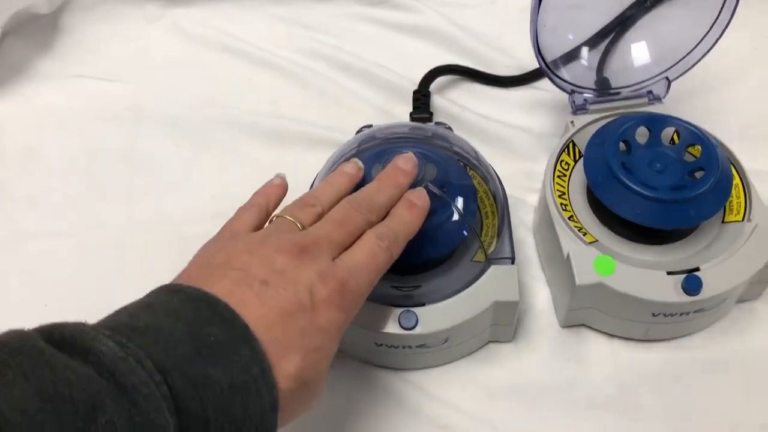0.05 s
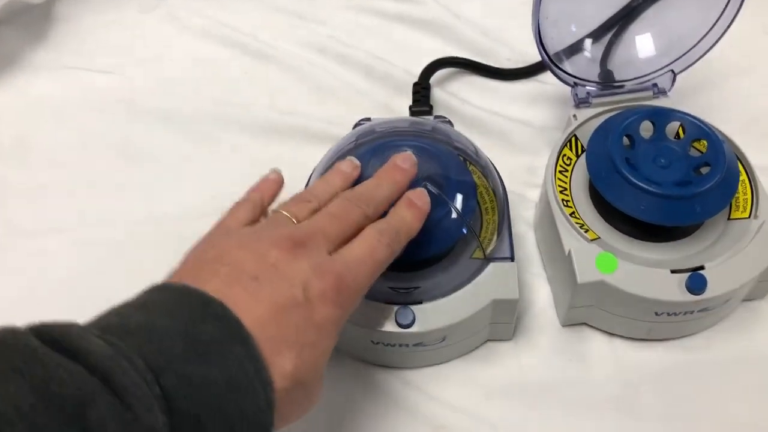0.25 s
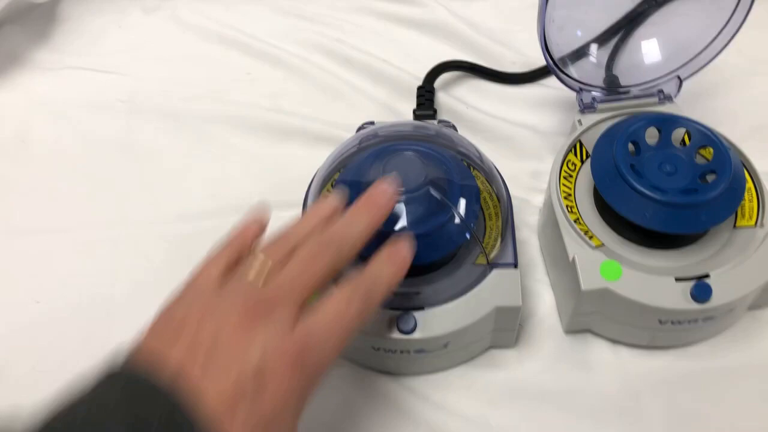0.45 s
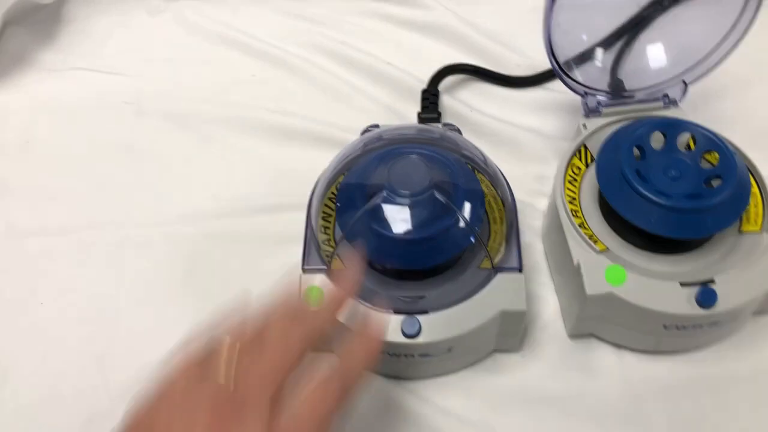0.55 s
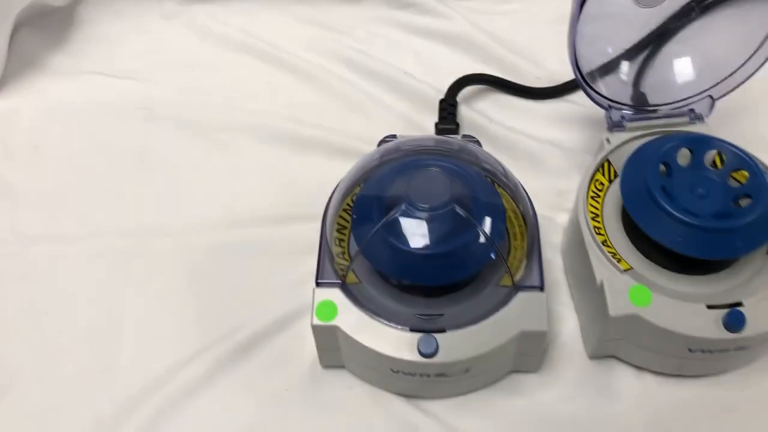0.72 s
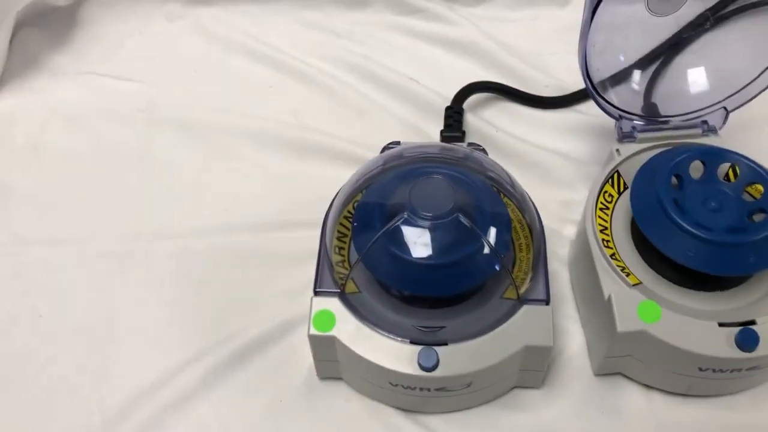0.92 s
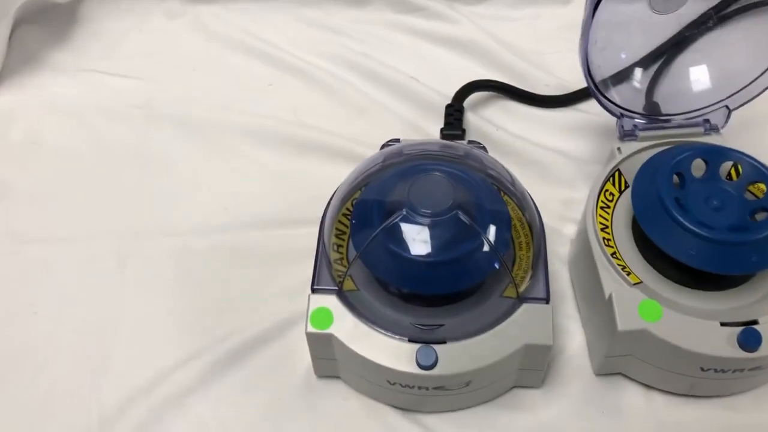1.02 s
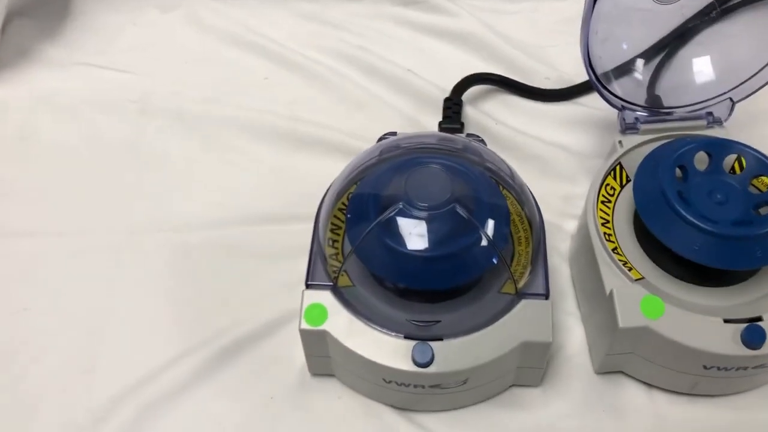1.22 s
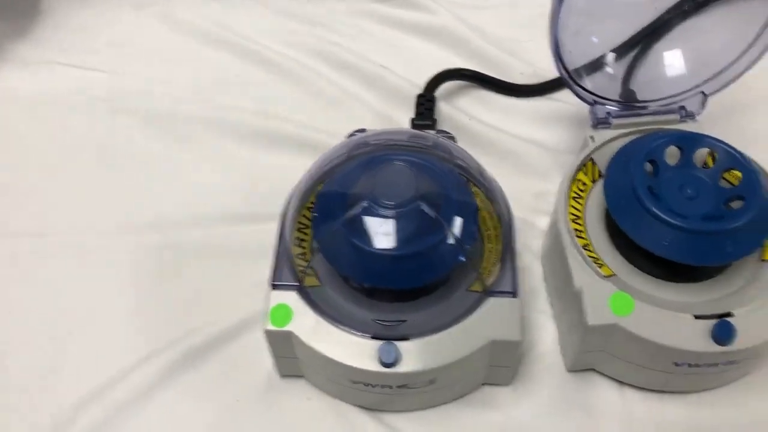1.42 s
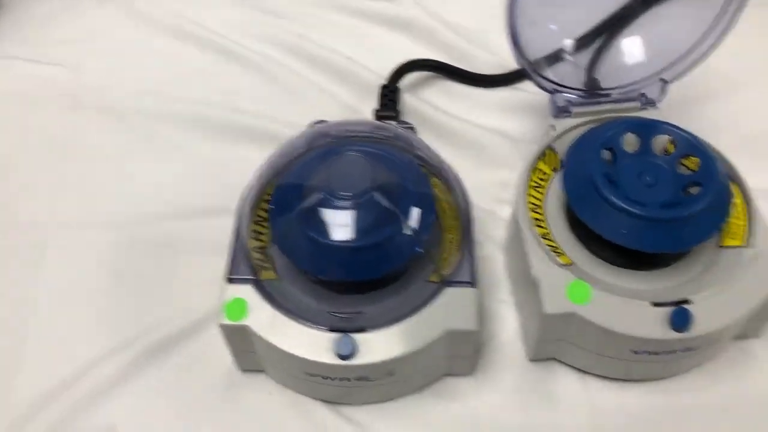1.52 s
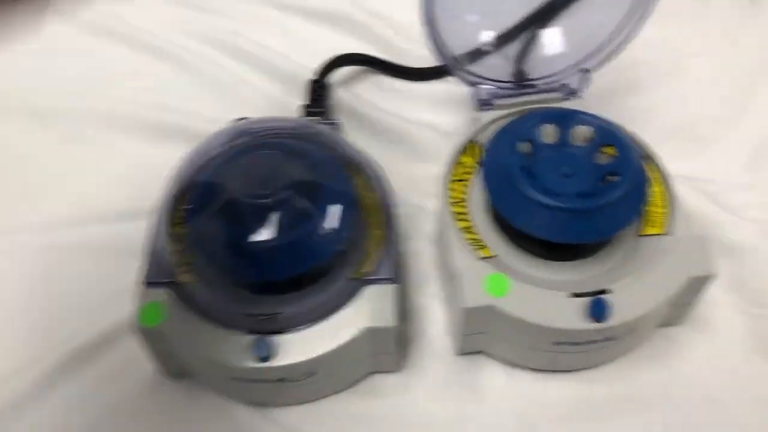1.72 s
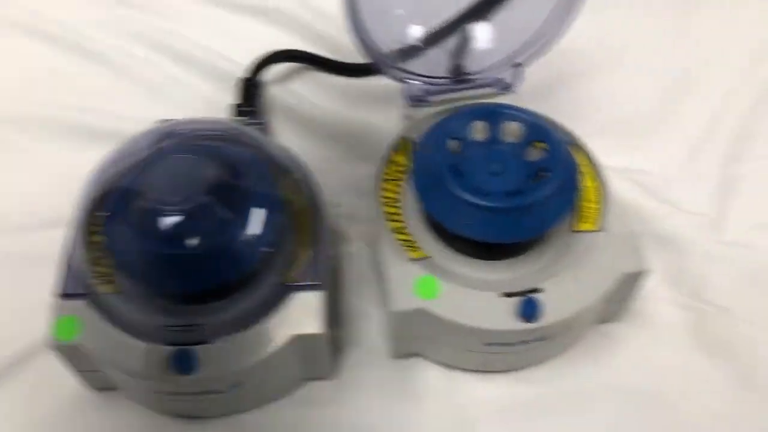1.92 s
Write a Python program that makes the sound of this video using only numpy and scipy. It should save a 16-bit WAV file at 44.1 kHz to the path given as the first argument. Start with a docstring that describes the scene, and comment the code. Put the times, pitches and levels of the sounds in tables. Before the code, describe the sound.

Close up in a quiet small room, a centrifuge's plastic lid ticks and clacks shut, soft clicks follow as the hand lets go, and the electric motor spins up with a growing whir and hiss.

```python
"""Closing the lid of a mini centrifuge

Close microphone, mono, in a small quiet room: a hand presses the plastic lid shut. It ticks, snaps home
and knocks the base, then clicks as the hand lets go; these contacts are noise bursts and struck modes.
Closing starts a small brush motor that runs up towards its top speed. Its harmonics sweep through the
housing's resonances, the brushes rasp over a surface met again on every turn, and the bearing rumbles."""
import sys
import numpy as np
from scipy import signal
from scipy.fft import rfft, irfft
from scipy.io import wavfile

SR = 44100
rng = np.random.default_rng(int(sys.argv[2]) if len(sys.argv) > 2 else 0)


def store_wav(level_fs):
    """Save 16-bit WAV to argv[1]."""
    pcm = np.round(np.clip(np.atleast_2d(level_fs), -1, 1) * 32767)
    wavfile.write(sys.argv[1], SR, pcm.T.astype(np.int16))


N = 85995

TOP_SPEED_HZ, MOTOR_ON_S, RUN_UP_S = 115.12, .2266, 1.007
REFERENCE_SPEED_HZ = 80  # turns per second at which growth gains are 0 dB
THROB_TURN = .76  # place in the turn where hum and bearing throb
CUTOFF_HZ = 15900  # top of the recorder's range


def undb(db):
    """Decibels to gain."""
    return 10 ** (np.asarray(db) / 20)


def unit(x):
    """Scale to rms 1."""
    return x / np.sqrt(np.mean(x ** 2))


def gain_at(hz, points):
    """Gain of a (Hz, dB) curve at the given frequencies, interpolated over log frequency."""
    f, db = np.array(points).T
    return undb(np.interp(np.log(np.maximum(hz, 1)), np.log(f), db))


def colour(x, points):
    """Causal minimum-phase filter with the shape of a (Hz, dB) curve; white noise keeps its level."""
    bins_hz = np.arange(N + 1) * SR / (2 * N)
    cepstrum = irfft(np.log(unit(gain_at(bins_hz, points))))
    # folding the cepstrum onto positive time makes the filter causal
    cepstrum[1:N] *= 2
    cepstrum[N + 1:] = 0
    response = np.exp(rfft(cepstrum))
    return irfft(rfft(x, 2 * N) * response)[:N]


def filtered(x, hz, kind, order=2):
    """Butterworth filter."""
    edges = np.clip(hz, 10, SR / 2 - 100)
    return signal.sosfilt(signal.butter(order, edges, kind, fs=SR, output="sos"), x)


def band_around(x, centre_hz, width_hz, order=2):
    """Narrow band of rms 1."""
    return unit(filtered(x, [centre_hz - width_hz / 2, centre_hz + width_hz / 2], "band", order))


def noise():
    """White noise with an expected rms of 1."""
    return rng.standard_normal(N)


def fade(t, start, ms):
    """Exponential decay from a starting time, down to 1/e after the given milliseconds."""
    return (t >= start) * np.exp(-np.maximum(t - start, 0) * 1000 / ms)


def fall(age, t60):
    """Exponential decay that loses 60 dB in t60 seconds."""
    return np.exp(-np.log(1000) * age / t60)


def ring(t, start, hz, t60):
    """A struck mode: a decaying sine."""
    age = np.maximum(t - start, 0)
    return np.sin(2 * np.pi * hz * age) * fall(age, t60)


def burst(envelope, count=3):
    """Noise under an envelope, evened out to a nearly flat spectrum."""
    x = envelope * rng.standard_normal(len(envelope))
    for _ in range(count):
        flat = irfft(np.exp(1j * np.angle(rfft(x))), len(x)) * np.linalg.norm(envelope)
        x = np.clip(flat, -np.pi * envelope, np.pi * envelope)
    return x


def growth(speed, db_per_doubling):
    """Gain that follows the motor speed, with an extra linear fade-in below 10 turns per second."""
    doublings = np.log2(np.maximum(speed, 1) / REFERENCE_SPEED_HZ)
    return undb(db_per_doubling * doublings) * np.minimum(speed / 10, 1)


def air():
    """Steady background air of the room: coloured noise."""
    # spectrum shape of the air: f/Hz, relative level/dB
    air_curve = [(25, -15), (45, -8), (62, 12.5), (100, -3), (200, -2), (500, -17.5), (1000, -20.5),
                 (2500, -21), (6000, -34.5), (15000, -35)]
    return undb(-62) * colour(noise(), air_curve)


def lid(t, size=4096):
    """Each contact is an impact and a short crack that ring the lid."""
    # sharp contacts of lid and catch: t/s, level/dB, decay to 1/e in ms
    clicks = [(0.0227, -53.5, 4.3), (0.05, -42.5, 7.5), (0.0576, -46.5, 3), (.1008, -38.5, 7.4),
              (0.1056, -43, 2), (.1303, -38, 2.9), (0.1848, -46, 4.1), (0.2144, -43.5, 2.3),
              (0.2172, -37.5, 1.5), (0.228, -40.5, 14), (0.2358, -5.5, 2.68), (0.2384, -7.5, 1.6),
              (.256, -25.5, 14), (0.4774, -41, 1), (0.4841, -39.5, 5.6), (0.492, -50, 3.7),
              (0.512, -39.5, 6), (0.5125, -44, 6)]
    # spectrum shape of a click: f/Hz, relative level/dB
    click_curve = [(150, -13), (600, -4), (1100, -2), (1800, 3.5), (2400, .5), (3050, 5), (3700, 1),
                   (6000, -2.5), (9000, -3.5), (11500, -1.5), (15500, -3)]
    # modes of the lid: f/Hz, level/dB, t60/s
    lid_modes = [(1620, -31, .06), (1830, -24, .06), (2040, -29, .06), (2950, -26, .06), (3070, -29, .05),
                 (3275, -22, .045), (4060, -28, .06)]
    crack, taps = np.zeros(N), np.zeros(N)
    for s, db, ms in clicks:
        start = int(s * SR)
        crack[start:start + size] += undb(db) * burst(fade(t[:size], 0, ms))
        taps[start] += undb(db)
    modes = sum(undb(db) * ring(t, 0, hz, t60) for hz, db, t60 in lid_modes)
    clack = colour(crack + undb(3) * taps, click_curve)  # impacts are raised by 3 dB
    return clack + signal.fftconvolve(taps, modes)[:N]


def base(t):
    """Each blow is a damped push with a dull thud; it rings the base's modes near its own pitch most."""
    # dull blows on the base: t/s, level/dB, push f/Hz, push decay to 1/e in ms
    knocks = [(0.055, -40.5, 557, 9.1), (.1015, -28.5, 626, 12), (.106, -46.5, 218, 15),
              (.2365, -20.5, 528, 4.4), (0.245, -19, 470, 6), (0.2537, -15.5, 504, 9.7),
              (0.259, -13.5, 296, 9), (.494, -39, 415, 13.5), (0.5135, -27, 394, 3.2)]
    # modes of the base: f/Hz, level/dB for a push at the mode's own pitch, t60/s
    base_modes = [(80, -17, .2), (156, -18, .18), (186, -17, .18), (298, -11, .13), (391, -19, .12),
                  (494, -12, .12), (556, -16, .12), (632, -17, .07), (800, -22, .07), (902, -19, .09),
                  (1022, -20, .09)]
    PUSH_RISE_MS = 1.2
    THUD_DB, THUD_MS, THUD_BAND_HZ = -4.5, 5.4, [189, 833]
    blows, thud = 0, 0
    for s, db, push_hz, ms in knocks:
        onset = undb(db) * np.clip((t - s) * 1000 / PUSH_RISE_MS, 0, 1)
        push = fade(t, s, ms) * np.sin(2 * np.pi * push_hz * (t - s))
        modes = 0
        for k, (hz, mode_db, t60) in enumerate(base_modes):
            nearness = min(hz / push_hz, push_hz / hz) ** 0.21
            sign = (-1) ** k  # neighbouring modes start in opposite directions
            modes = modes + undb(mode_db) * nearness * sign * ring(t, s, hz, t60)
        blows = blows + onset * (push + modes)
        thud = thud + onset * undb(THUD_DB) * fade(t, s, THUD_MS)
    return blows + thud * unit(filtered(noise(), THUD_BAND_HZ, "band"))


def room(t, x):
    """Dense early echoes from bench and walls, then a tail whose decay differs from band to band."""
    # room echo by band: centre f/Hz, level/dB, t60/s of the tail
    room_bands = [(151, -14.5, 0.66), (390, -10.5, 0.575), (930, -10.5, 0.28), (2180, -13.5, 0.29),
                  (4400, -10, 0.28), (7700, -23, 0.1), (13900, -30.5, .22)]
    BUILD_S, EARLY_DB, EARLY_T60_S = 0.0096, 6, 0.16
    centres = np.array(room_bands)[:, 0]
    edges = np.concatenate([[centres[0] / 2], np.sqrt(centres[1:] * centres[:-1]), [CUTOFF_HZ]])
    response = 0
    for k, (hz, db, t60) in enumerate(room_bands):
        decay = fall(t, t60) + undb(EARLY_DB) * fall(t, EARLY_T60_S)
        shape = decay * np.minimum(t / BUILD_S, 1)
        echoes = filtered(burst(shape), edges[k:k + 2], "band")
        response = response + undb(db) * echoes / np.linalg.norm(shape)
    return signal.fftconvolve(x, response)[:N]


def hum(speed, turns):
    """Motor harmonics bunch into one throb a turn and swell as they cross the housing's resonances."""
    # motor harmonics: multiple of the turn rate, level/dB at the reference speed before the housing,
    # growth/dB per doubling of speed
    harmonics = [(2, -56.5, -14), (3, -57.5, 8.5), (4, -66, 9), (5, -53, 17), (6, -55, 16), (7, -57.5, 22),
                 (8, -89, -8), (9, -55, 2), (10, -80, 15), (11, -71.5, -8), (12, -71, -8), (13, -66, 4),
                 (14, -80, -2), (15, -64, -5), (16, -77, -8.5), (17, -75.5, 32), (18, -90, 19),
                 (21, -68, 1), (27, -68, 8), (33, -70, 7), (46, -66, 17), (49, -73, 17), (51, -64.5, 13),
                 (60, -63.5, 21), (62, -67.5, 18), (69, -64.5, 16), (75, -65.5, 14)]
    # resonances of the housing: f/Hz, gain/dB
    housing = [(100, -33), (170, -3), (200, -1), (270, 1.5), (310, -1.5), (365, 2), (455, -7), (545, -3),
               (680, -9), (790, -4.5), (860, 5.5), (1000, -9), (1200, -14.5), (1290, 13), (1400, 0),
               (1560, -9), (1690, -6), (1770, 8.5), (1850, -3), (2600, -20), (3300, -2.5), (3850, 5),
               (4200, -32), (4550, -4), (4850, 1), (5100, -25), (5450, -5), (5850, 11), (6200, 0),
               (6500, -20), (7000, 0)]
    PHASE_SCATTER_CYCLES = .13  # random spread of each harmonic's phase
    FULL_HUM_HZ = 36.3  # speed at which the hum has built up
    tones = 0
    for k, db, rise_db in harmonics:
        level = undb(db) * growth(speed, rise_db) * gain_at(k * speed, housing)
        cycles = k * (turns - THROB_TURN) + PHASE_SCATTER_CYCLES * rng.standard_normal()
        tones = tones + level * np.sin(2 * np.pi * cycles)
    return tones * np.minimum(speed / FULL_HUM_HZ, 1) ** 3


def track(turns, size=512, order=8):
    """A random surface profile with all harmonics equally strong, met again on every turn."""
    profile = irfft(np.exp(2j * np.pi * rng.random(size // 2)), size * order)
    around = np.linspace(0, 1, size * order + 1)
    # read at twice the sample rate to limit aliasing
    fine = np.interp(np.arange(2 * N) / 2, np.arange(N), turns)
    surface = np.interp(fine % 1, around, np.append(profile, profile[0]))
    return signal.resample_poly(surface, 1, 2)


def cavity(t, x):
    """Short dense echoes under the lid make many narrow resonances."""
    echoes = noise() * fade(t, 0, 7)
    echoes = echoes / np.linalg.norm(echoes)
    return unit(x + undb(-3) * signal.fftconvolve(x, echoes)[:N])


def brushes(t, speed, turns, count=3):
    """Brushes rub three commutator segments with a slight wobble, sing faintly, catch on one spot a turn."""
    # spectrum shape of the brush rasp: f/Hz, relative level/dB
    brush_curve = [(300, -17), (1200, -4.5), (1800, -13), (2400, -16), (3200, -8), (3900, -3.5), (4500, 2),
                   (5200, -4.5), (6200, -1.5), (7300, -3.5), (9300, -3.5), (10000, -5), (10700, -4.5),
                   (12000, -1), (13200, -4.5), (14500, 1.5), (15800, -3.5)]
    WOBBLE_US, WOBBLE_TOP_HZ = 9, 150  # rms timing wobble and its low-pass corner
    SEGMENT_DB, SEGMENT_DEPTH, HISS_DB = 3.5, .2, -6
    BRUSH_DB, SPLIT_HZ = -48, 4300
    BRUSH_GROWTH_DB, SIZZLE_GROWTH_DB = 16, 14  # per doubling of speed, below and above the split
    SCRAPE_HZ, SCRAPE_WIDTH_HZ, SCRAPE_DB = 4350, 1200, -51.5
    SCRAPE_TURN, SCRAPE_SPREAD = .2, .065  # place and spread of the spot, in turns
    SING_HZ, SING_WIDTH_HZ, SING_DB, SING_GROWTH_DB = 10000, 180, -61, 14

    place = turns + speed * WOBBLE_US * 1e-6 * unit(filtered(noise(), WOBBLE_TOP_HZ, "low"))
    whole_turn = unit(track(place, size=1320))
    segments = unit(track(count * place, size=440))
    rub = cavity(t, whole_turn + undb(SEGMENT_DB) * segments + undb(HISS_DB) * noise())
    rub = rub * (1 + SEGMENT_DEPTH * np.cos(2 * np.pi * count * turns))

    rasp = undb(BRUSH_DB) * colour(rub, brush_curve)
    low = filtered(rasp, SPLIT_HZ, "low", order=1)
    sizzle = rasp - low

    from_spot = (turns - SCRAPE_TURN + .5) % 1 - .5
    spot = np.exp(-.5 * (from_spot / SCRAPE_SPREAD) ** 2)
    scrape = undb(SCRAPE_DB) * band_around(rub + noise(), SCRAPE_HZ, SCRAPE_WIDTH_HZ) * spot
    scrape = scrape * np.interp(t, [.62, .8], [0, 1])  # the scrape fades in during the run-up
    sing = undb(SING_DB) * band_around(rub + noise(), SING_HZ, SING_WIDTH_HZ, order=1)
    return (low * growth(speed, BRUSH_GROWTH_DB) + sizzle * growth(speed, SIZZLE_GROWTH_DB)
            + scrape + sing * growth(speed, SING_GROWTH_DB))


def bearing(speed, turns):
    """Rumble in the housing that throbs once a turn."""
    # spectrum shape of the bearing rumble: f/Hz, relative level/dB
    bearing_curve = [(100, -8.5), (200, -18.5), (330, 5), (580, 2), (700, -2), (850, 0.5), (1100, -22.5),
                     (1290, 0), (1450, -17), (1700, -12.5), (1775, 0), (1860, -13.5), (2400, -41),
                     (4000, -28)]
    LEVEL_DB, GROWTH_DB, DEPTH = -58, 3.5, 0.17  # growth per doubling of speed
    throb = 1 + DEPTH * np.cos(2 * np.pi * (turns - THROB_TURN))
    return undb(LEVEL_DB) * growth(speed, GROWTH_DB) * colour(noise() * throb, bearing_curve)


def scene():
    """The lid closes, and the motor nears its top speed exponentially; only the contacts stir the room."""
    t = np.arange(N) / SR
    speed = TOP_SPEED_HZ * (1 - np.exp(-np.maximum(t - MOTOR_ON_S, 0) / RUN_UP_S))
    turns = np.cumsum(speed) / SR
    contacts = filtered(lid(t) + base(t), 75, "high")
    motor = hum(speed, turns) + brushes(t, speed, turns) + bearing(speed, turns)
    mono = air() + contacts + room(t, contacts) + motor
    return np.array([mono, mono])


def record(dry):
    """The recorder rounds the loudest peaks and cuts the top."""
    top_cut = signal.ellip(10, .2, 80, CUTOFF_HZ, fs=SR, output="sos")
    return signal.sosfilt(top_cut, np.tanh(dry))


dry = scene()
out = record(dry)
store_wav(out)
```